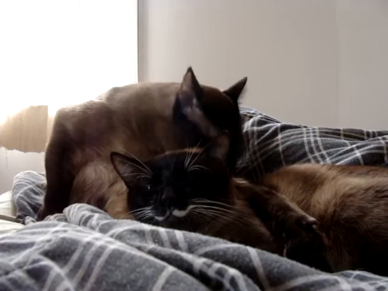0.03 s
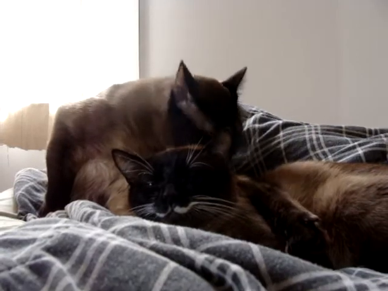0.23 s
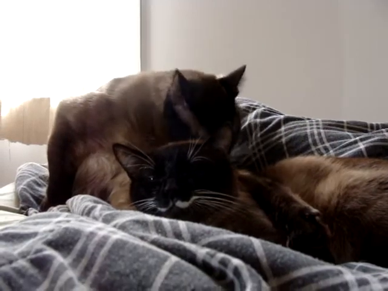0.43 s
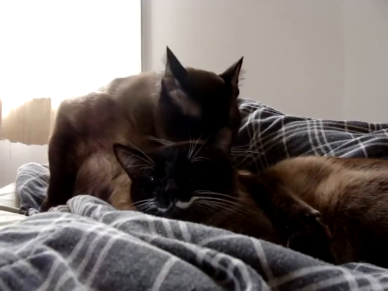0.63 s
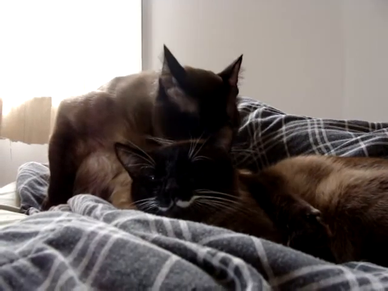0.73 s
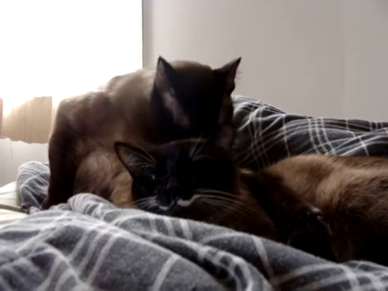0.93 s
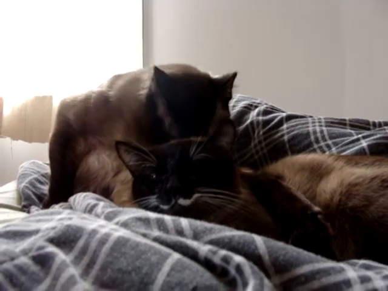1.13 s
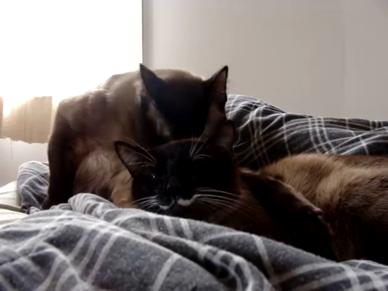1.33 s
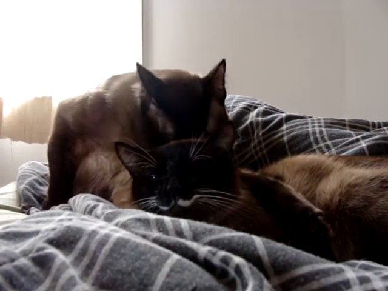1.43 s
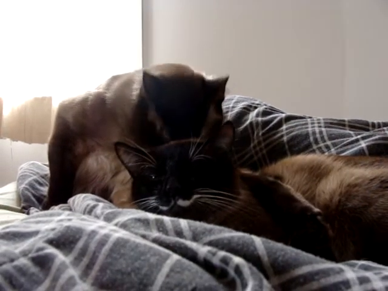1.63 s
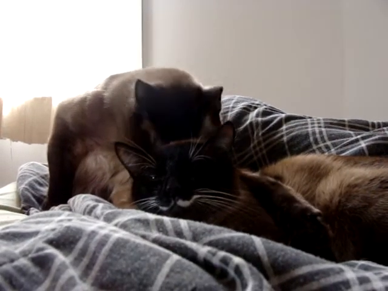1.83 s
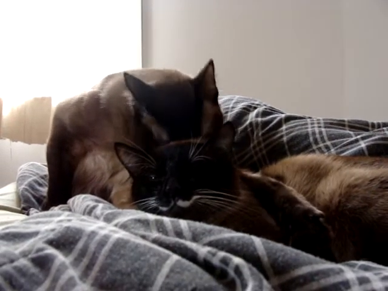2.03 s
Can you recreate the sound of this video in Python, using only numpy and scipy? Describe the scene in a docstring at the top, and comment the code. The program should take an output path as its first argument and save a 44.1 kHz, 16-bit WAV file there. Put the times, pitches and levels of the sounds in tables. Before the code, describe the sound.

A cat's mouth smacks once, followed by faint wet ticks and licks in a quiet room.

```python
"""On a bed in a quiet room, two cats groom each other, close to one microphone.
A wet lip parts with a small rising pop, then the tongue snaps free and the mouth rings: one sharp smack.
Faint ticks of saliva, a dull double tap of the jaw and soft licks on fur follow.
Behind them are the steady hiss and soft drone of the room's air, and a low hum that swells and sinks."""
import sys
import numpy as np
from scipy import signal
from scipy.fft import rfft, irfft
from scipy.io import wavfile

SR = 44100
rng = np.random.default_rng(int(sys.argv[2]) if len(sys.argv) > 2 else 0)


def generate_wav(signal):
    """Clip the signal to [-1, 1] and save it as 16-bit WAV at the path in sys.argv[1]."""
    frames = np.transpose(np.atleast_2d(signal))
    scaled = np.clip(frames, -1, 1) * 32767
    pcm = np.round(scaled).astype(np.int16)
    wavfile.write(sys.argv[1], SR, pcm)


N = 92610  # 2.1 seconds

# The tongue comes free in one sharp snap between small tears. Each row: start in seconds, strength in dB.
TONGUE_SNAPS = [(0.2424, -28), (0.2432, -36), (0.2442, -10), (0.2463, -32)]
# The tones the mouth rings with. Each row: pitch in Hz, relative level in dB, ring time in seconds.
# A ring time is how long a tone takes to fade by 60 dB.
MOUTH_TONES = [(2810, -13, .010), (3230, -11, 0.013), (3520, -2.5, 0.0095), (4470, -11, 0.0081),
               (4720, -13.5, 0.012), (5000, -24, 0.0061), (6080, -22, 0.014), (7300, -23, 0.0045),
               (7850, -29, 0.0055), (8130, -14, 0.0097), (8760, -11.5, 0.009), (8800, -19.5, 0.0055),
               (9540, -11.5, 0.0077)]
# Small wet ticks. Each row: start in seconds, strength in dB, pitch in Hz, ring time in seconds.
SALIVA_TICKS = [(0.2175, -36, 4000, .003), (0.2202, -39, 3700, .003), (0.2465, -38.5, 1380, 0.028),
                (0.2815, -41, 3780, .008), (0.5237, -27, 2200, 0.0027), (0.6387, -41, 3180, 0.013),
                (0.6502, -39, 3220, .007), (0.7208, -44.5, 2140, 0.013), (0.721, -34.5, 5000, .004),
                (1.107, -44, 2800, 0.0065), (1.602, -41, 4200, .004)]
# The jaw closes with a double tap. Each row: start in seconds, strength in dB.
JAW_TAPS = [(0.6387, -33.5), (0.6409, -40.5)]
# The tones of a jaw tap. Each row: pitch in Hz, relative level in dB, ring time in seconds.
JAW_TONES = [(350, -7, 0.015), (860, 0, .006), (2600, -1, .001)]
# Soft strokes of tongue and head over fur.
# Each row: middle of the stroke in seconds, length in seconds, level in dB, centre pitch in Hz.
FUR_STROKES = [(0.664, .12, -63, 3200), (0.962, 0.07, -63.5, 2750), (1.084, .09, -64, 2750),
               (1.355, 0.073, -66.5, 5700), (1.764, 0.082, -66.5, 5400), (1.9, 0.053, -68, 5000),
               (2.048, 0.034, -64, 2600)]
# The hiss of the air, from bass to treble. Each row: frequency in Hz, relative level in dB.
AIR_SPECTRUM = [(20, -28), (42, -18), (56, -14), (74, -14.5), (108, 0.5), (145, -4), (175, -6.5),
                (320, -8.5), (600, -9), (1000, -10), (1700, -13), (2500, -15.5), (3700, -19.5),
                (5000, -19.5), (7000, -22.5), (10000, -24)]
# Narrow bands of noise that make the room's drone. Each row: pitch in Hz, width in Hz, level in dB.
DRONE_BANDS = [(56.7, 7.3, -79), (114.4, 34, -66), (234.4, 16, -78), (267.4, 6.8, -71), (457, 16, -71.5),
               (525.6, 25, -69.5), (674.5, 20, -66.5), (1173, 37, -73.5), (1510, 5.7, -78.5),
               (2215, 10, -76), (2700, 37, -69), (3250, 47, -71), (4087, 63, -71.5), (7700, 41, -85)]
# The low hum swells early on, then sinks. Each row: time in seconds, level in dB.
HUM_LEVELS = [(0, -70), (0.3, -60), (0.45, -63.5), (0.78, -62), (0.9, -70), (2.1, -73)]


def tongue_smack():
    """The tongue snaps free and makes the mouth ring for a few milliseconds."""
    snaps = clicks(TONGUE_SNAPS)
    mouth = sum(from_db(db) * ring(snaps, hz, ring_s) for hz, db, ring_s in MOUTH_TONES)
    return keep_band(mouth, hz=2560, kind="high", order=10)


def lip_pop():
    """The lips part and the hollow behind them shrinks, so its tone rises. The wet film adds a flutter."""
    start_s, attack_s, ring_s = 0.2174, 0.00027, 0.016
    from_hz, to_hz, glide_s = 860, 2220, 0.00061
    age = np.maximum(np.arange(N) / SR - start_s, 0)
    hz = to_hz + (from_hz - to_hz) * np.exp(-age / glide_s)
    phase = 2 * np.pi * np.cumsum(hz * (age > 0)) / SR
    tone = np.sin(phase) + from_db(-12) * np.sin(2 * phase)  # with one weak overtone
    rise = 1 - np.exp(-age / attack_s)
    fade = from_db(-60 * age / ring_s)
    flutter = 1 + 0.28 * unit_level(keep_band(rng.standard_normal(N), hz=890, kind="low"))
    return keep_band(from_db(-27) * rise * fade * flutter * tone, hz=890, kind="high")


def saliva_ticks():
    """Tiny films of saliva break, each with one short ring."""
    rings = sum(ring(clicks([(s, db)]), hz, ring_s) for s, db, hz, ring_s in SALIVA_TICKS)
    without_bass = keep_band(rings, hz=1100, kind="high")
    return keep_band(without_bass, hz=4020, kind="low", order=4)


def jaw_taps():
    """The jaw closes with two soft taps, which start a few dull tones that die quickly."""
    taps = clicks(JAW_TAPS)
    rings = sum(from_db(db) * ring(taps, hz, ring_s) for hz, db, ring_s in JAW_TONES)
    return keep_band(rings, hz=3600, kind="low", order=4)


def fur_licks():
    """Barbs on the tongue flick hairs. The many tiny clicks blur into a rustle that swells and fades."""
    flicks_per_s, width_octaves = 4000, 0.5
    edge_ratio = 2 ** (width_octaves / 2)
    t, out = np.arange(N) / SR, np.zeros(N)
    for middle_s, length_s, db, hz in FUR_STROKES:
        flicks = (rng.random(N) < flicks_per_s / SR) * rng.standard_normal(N) + 1e-18
        band = signal.butter(2, [hz / edge_ratio, hz * edge_ratio], "band", fs=SR, output="sos")
        rustle = unit_level(signal.sosfilt(band, flicks))
        swell = np.exp(-(2 * (t - middle_s) / length_s) ** 2)
        out += from_db(db) * swell * rustle
    return out


def room_air():
    """An even hiss with a drone of narrow, noisy tones, like a distant fan."""
    out = from_db(-54) * shape_spectrum(rng.standard_normal(N), AIR_SPECTRUM)
    for hz, width_hz, db in DRONE_BANDS:
        ring_s = np.log(1000) / (np.pi * width_hz)  # a narrower band rings longer
        tone = ring(rng.standard_normal(N + SR), hz, ring_s)[SR:]  # skip a second while it builds up
        out += from_db(db) * unit_level(tone)
    return out


def room_hum(hz=141):
    """One low tone in the room that slowly changes in level."""
    t = np.arange(N) / SR
    times, db = np.transpose(HUM_LEVELS)
    return from_db(np.interp(t, times, db)) * np.sqrt(2) * np.sin(2 * np.pi * hz * t)


def from_db(db):
    """Turn decibels into a number to multiply a sound by."""
    return 10 ** (np.asarray(db) / 20)


def unit_level(x):
    """Scale a sound so that its average level (root mean square) is 1."""
    return x / np.sqrt(np.mean(x ** 2) + 1e-20)


def clicks(rows):
    """Make clicks one sample long. Each row: start in seconds, level in dB."""
    out = np.zeros(N) + 1e-18
    for start_s, db in rows:
        out[int(start_s * SR)] += from_db(db)
    return out


def ring(x, hz, ring_s):
    """Each click in x starts a tone of the same height that fades by 60 dB in ring_s seconds."""
    decay = from_db(-60 / (ring_s * SR))
    phase_step = 2 * np.pi * hz / SR
    return signal.lfilter([.5, 0, -.5], [1, -2 * decay * np.cos(phase_step), decay * decay], x)


def keep_band(x, hz, kind, order=2):
    """Keep what is below hz ("low") or above it ("high"). A higher order cuts more steeply."""
    return signal.sosfilt(signal.butter(order, hz, kind, fs=SR, output="sos"), x)


def shape_spectrum(x, spectrum):
    """Give a steady sound a smooth balance of bass and treble, at an average level of 1."""
    hz, db = np.transpose(spectrum)
    all_hz = np.maximum(np.fft.rfftfreq(N, 1 / SR), 1)
    gain = from_db(np.interp(np.log(all_hz), np.log(hz), db))
    return unit_level(irfft(rfft(x) * gain, N))


def scene():
    """Add the room and the cats together, the same on the left and the right."""
    room = room_air() + room_hum()
    mono = room + fur_licks() + tongue_smack() + lip_pop() + saliva_ticks() + jaw_taps()
    return np.array([mono, mono])


def record(dry):
    """Cut away the highest treble steeply, with a rounded edge."""
    cutoff_hz, edge_width_hz = 10100, 400
    hz = np.fft.rfftfreq(2 * N, 1 / SR)
    across_edge = np.clip((hz - cutoff_hz) / edge_width_hz, -.5, .5)
    gain = (.5 - .5 * np.sin(np.pi * across_edge)) ** 2
    return irfft(rfft(dry, 2 * N) * gain, 2 * N)[:, :N]


dry = scene()
out = record(dry)
generate_wav(out)
```